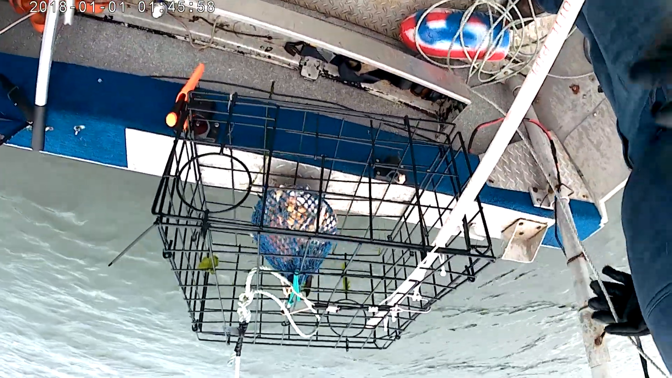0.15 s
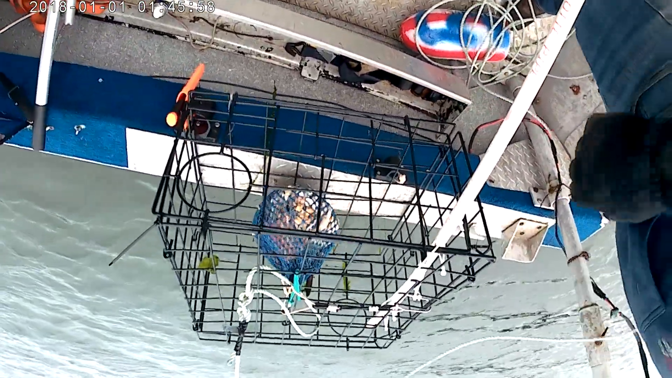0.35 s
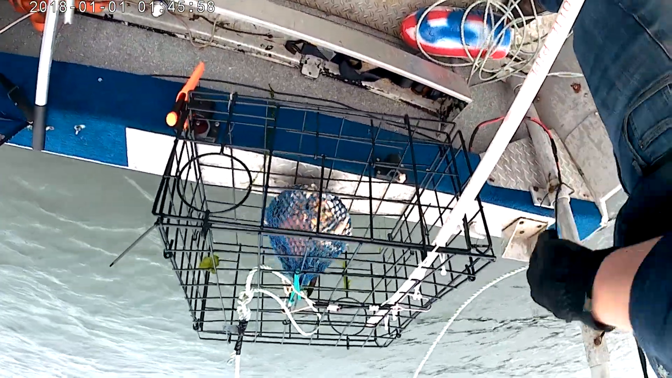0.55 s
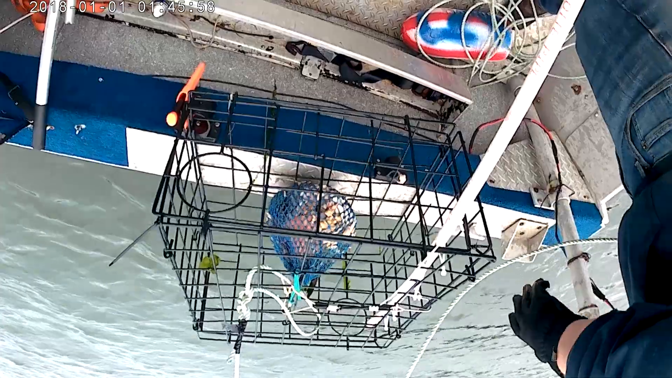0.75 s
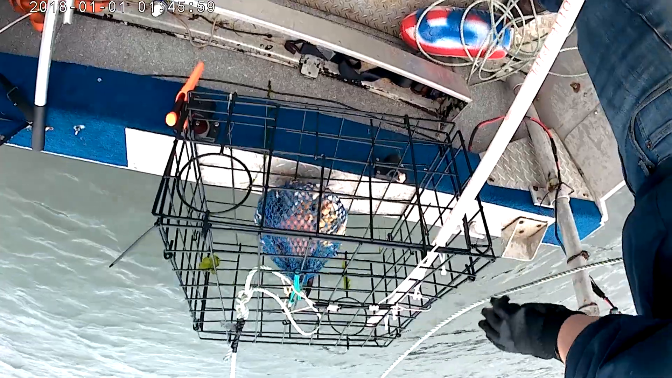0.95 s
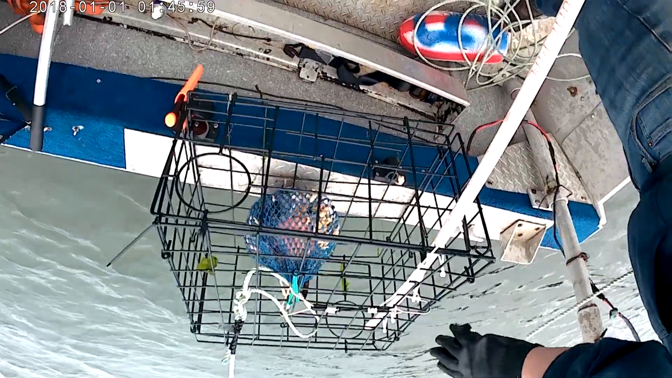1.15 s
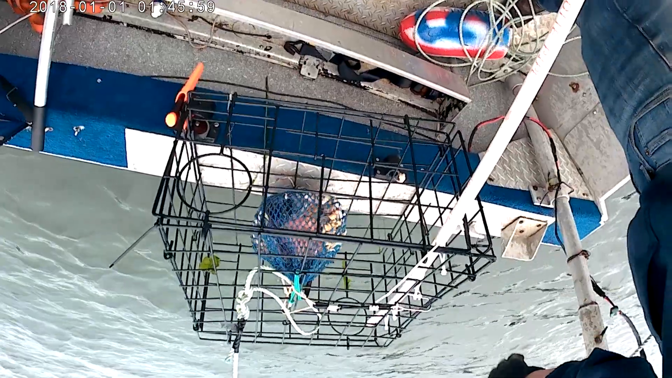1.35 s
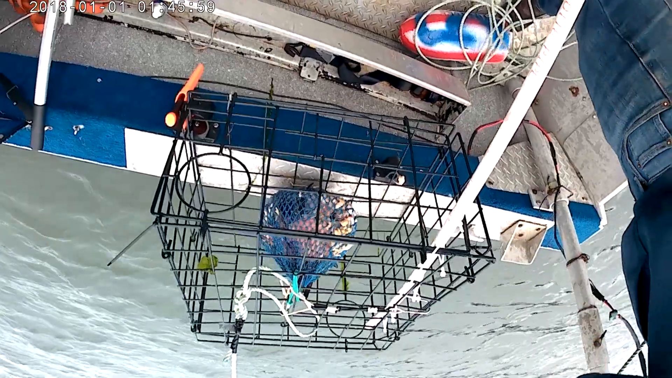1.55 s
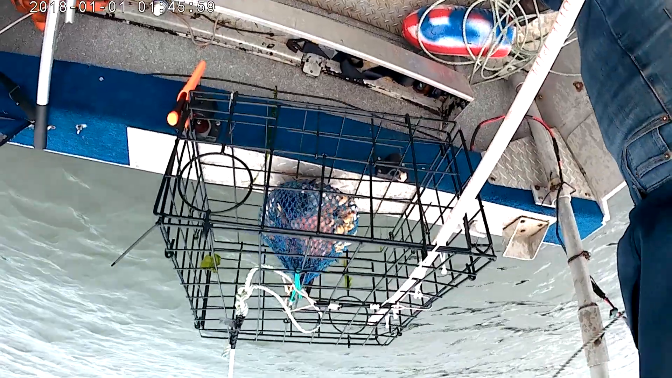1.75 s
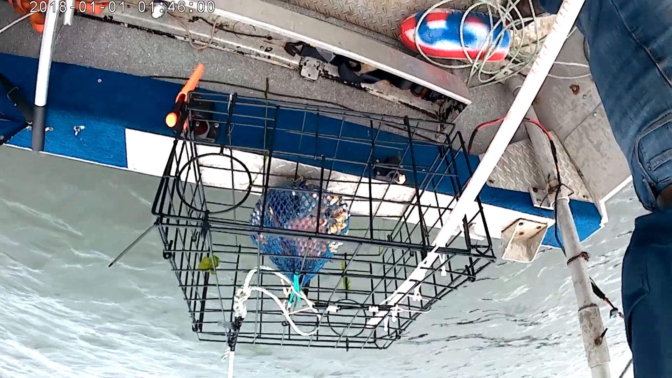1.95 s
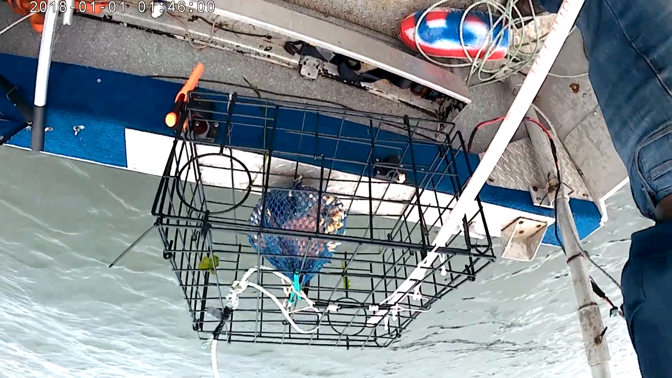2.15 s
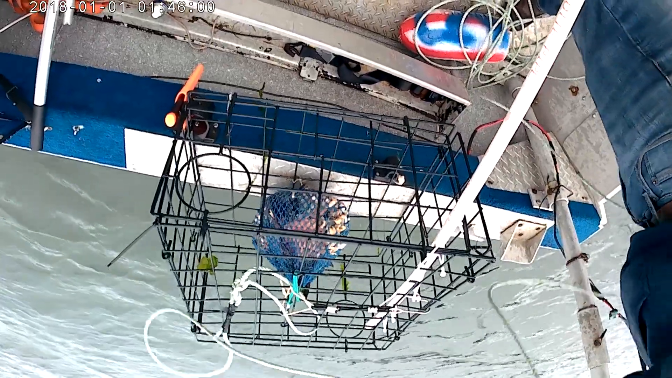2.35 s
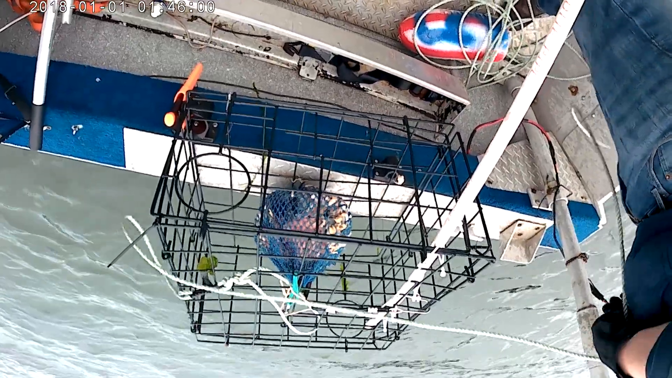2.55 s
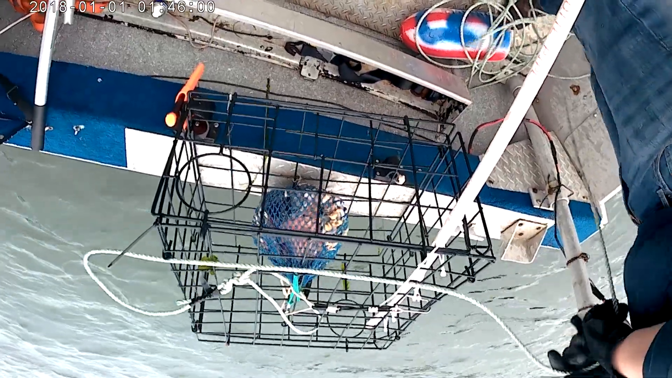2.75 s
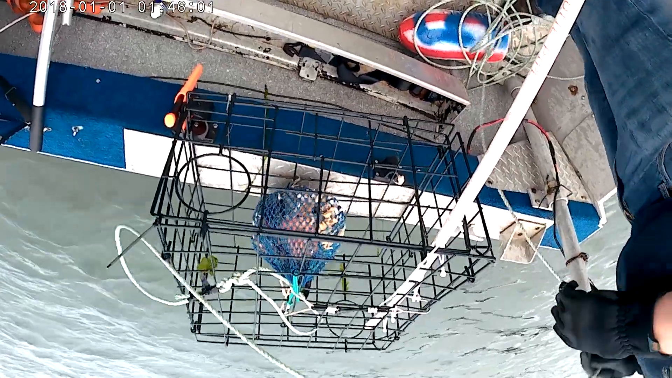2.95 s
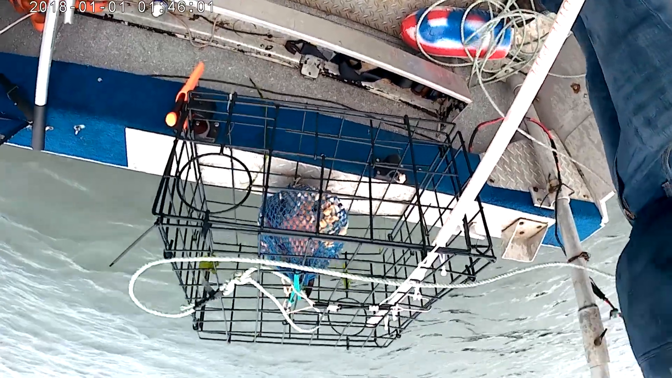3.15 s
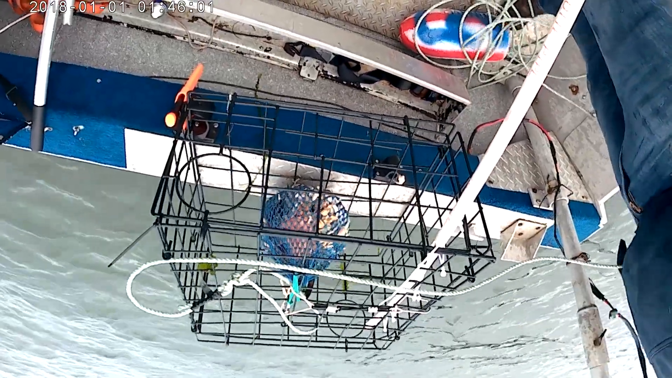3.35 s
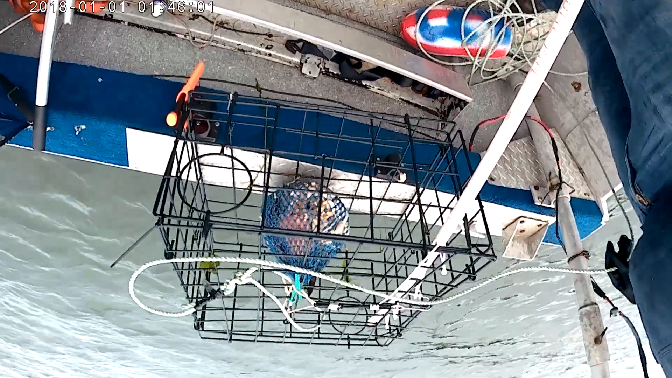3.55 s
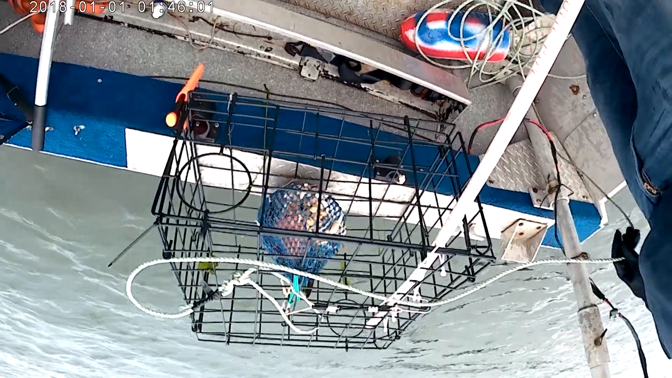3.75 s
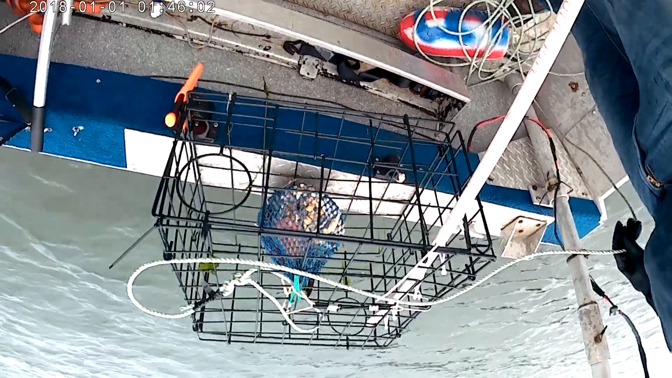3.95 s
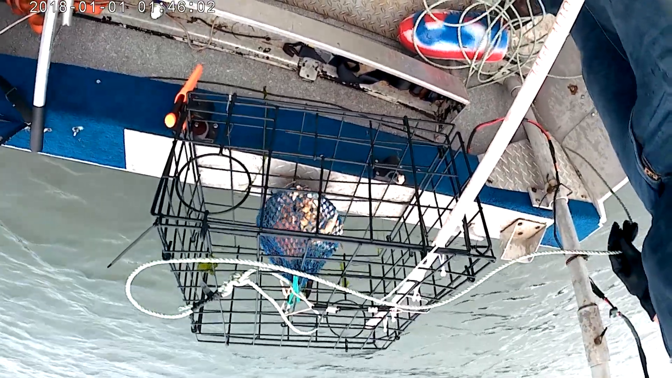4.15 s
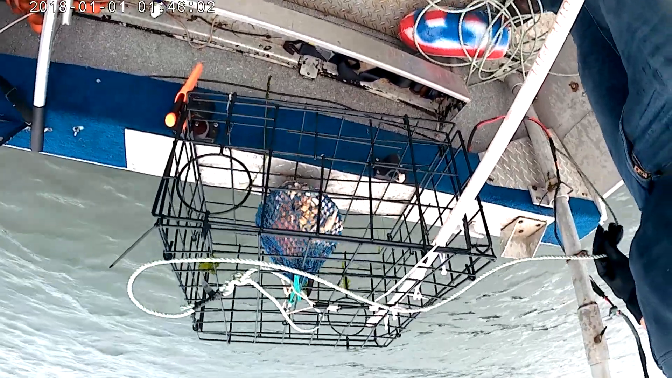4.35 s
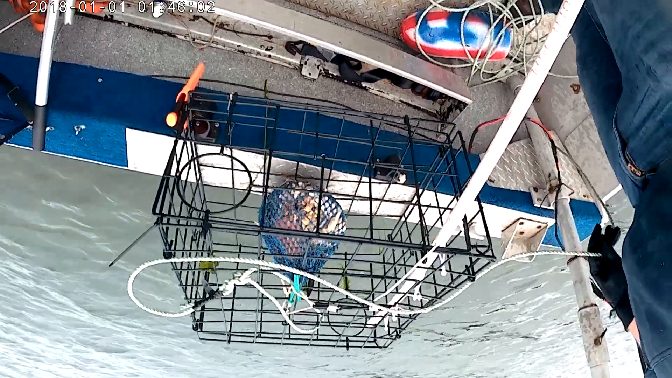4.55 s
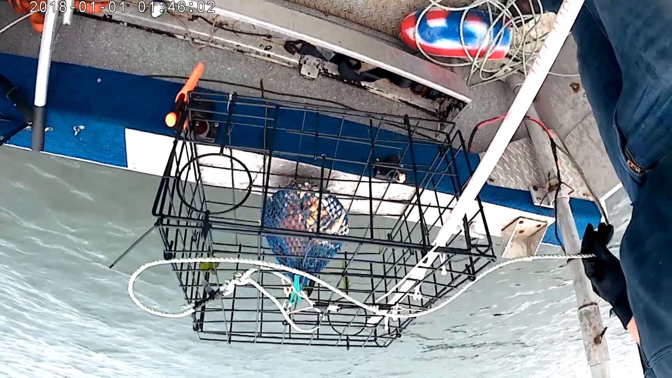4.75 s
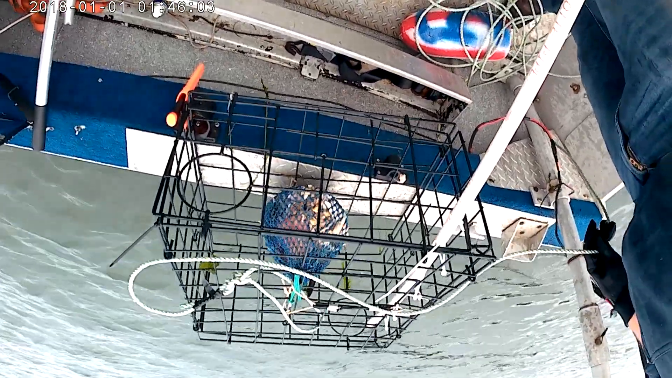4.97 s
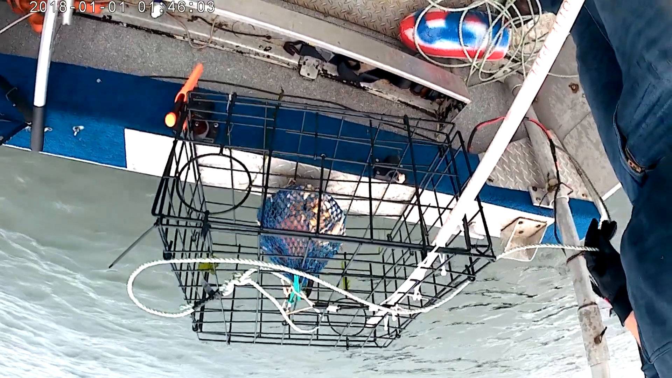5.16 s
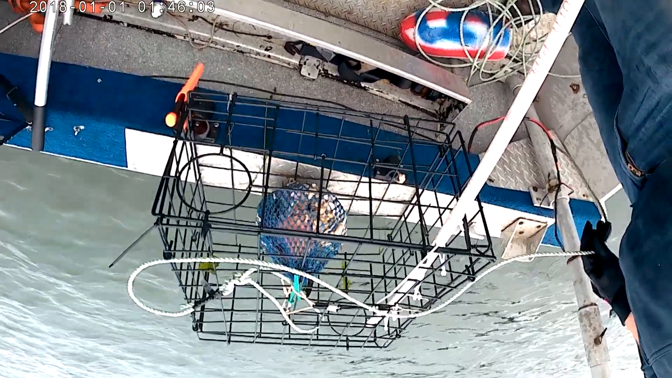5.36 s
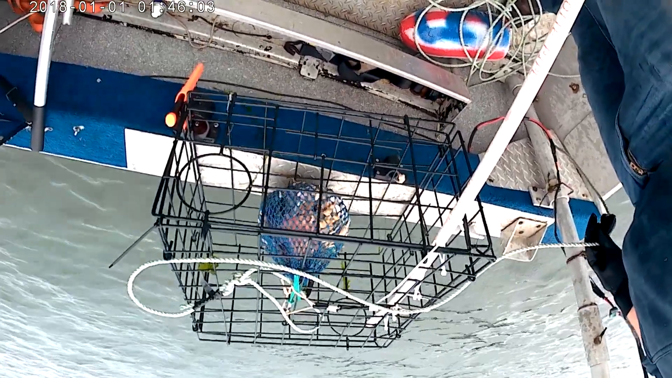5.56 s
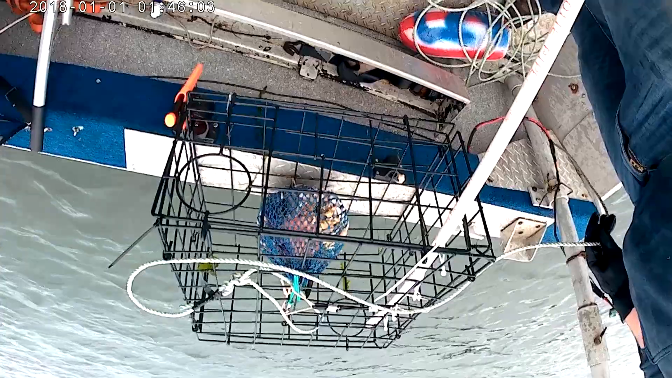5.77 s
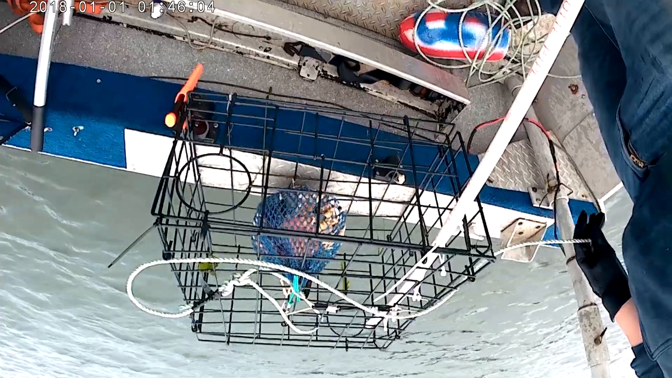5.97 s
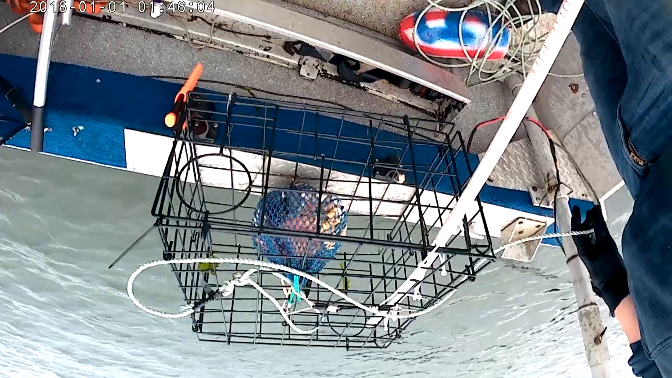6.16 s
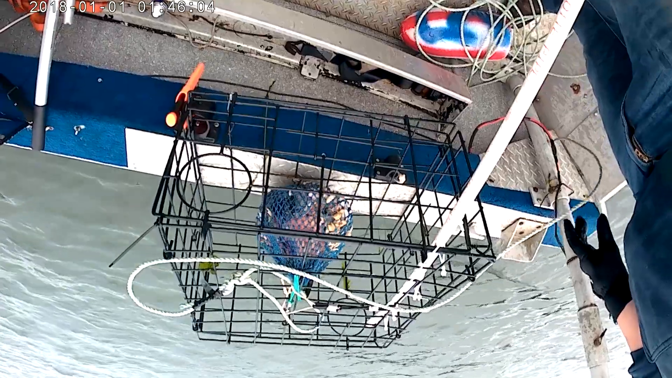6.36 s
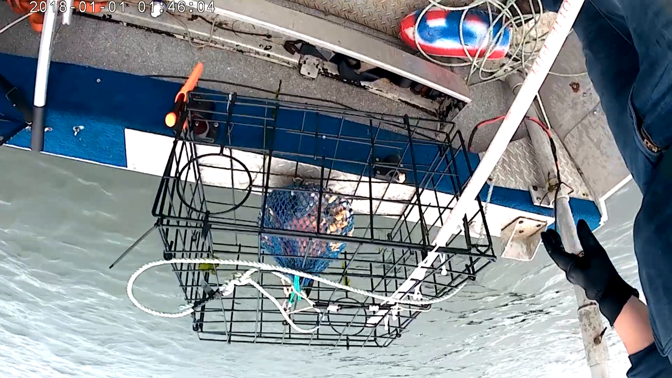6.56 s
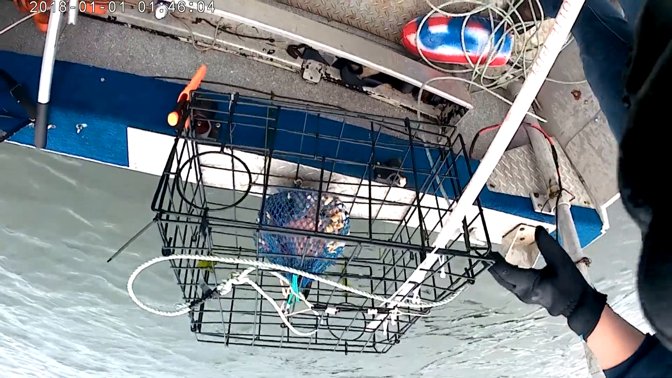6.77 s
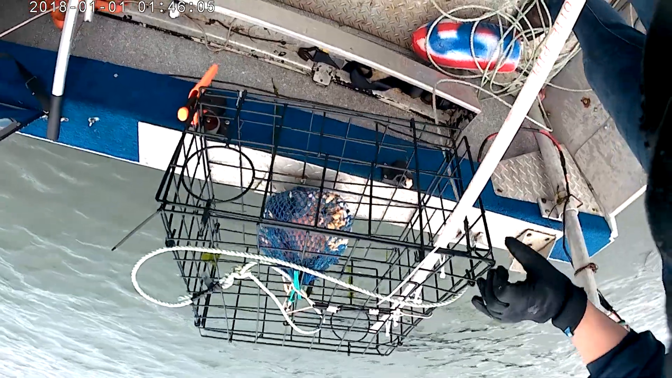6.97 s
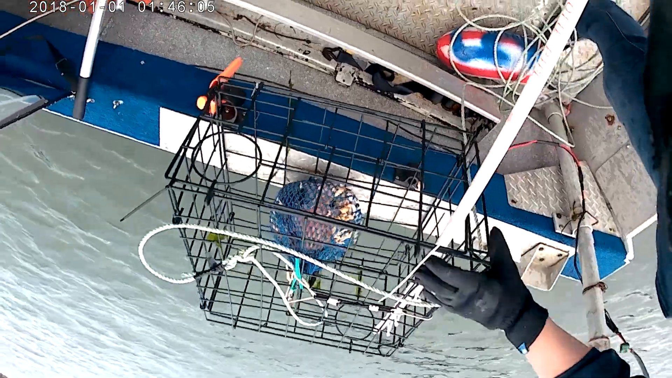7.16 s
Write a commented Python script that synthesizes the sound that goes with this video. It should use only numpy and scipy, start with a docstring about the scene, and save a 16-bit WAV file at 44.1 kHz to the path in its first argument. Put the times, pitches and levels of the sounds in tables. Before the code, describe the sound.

Heard dully from a sealed housing fixed to a boat, a low engine throb and boom run under steady light drips and soft hollow wavelets on the hull. A rope is thrown, clattering and scraping over wire and rail, whirring briefly before a hard, ringing bang. Dripping resumes; later the rope slides again and low wind puffs buffet the microphone.

```python
"""A boat idles with a wet wire crab trap beside it, heard dully through a sealed housing fixed to the boat.
Throb, boom and rumble run throughout; cloth brushes, drops ping and wavelets slap the hull.
A rope is thrown clear, clatters over wire and rail and whirrs; something knocks hard on the hull and rail.
Later the rope is drawn through again and wind buffets the housing.
Blows, water and rope excite decaying hull modes; drops and rail have modes of their own; wind is noise."""
import sys
import numpy as np
from scipy import signal
from scipy.fft import rfft, irfft
from scipy.io import wavfile
from scipy.ndimage import uniform_filter1d

SR = 44100
rng = np.random.default_rng(int(sys.argv[2]) if len(sys.argv) > 2 else 0)


def generate_wav(sig):
    """Save sig (samples, or channels by samples) to the path in sys.argv[1] as 16-bit PCM at SR."""
    pcm = np.round(np.clip(np.atleast_2d(sig).T, -1, 1) * 32767).astype(np.int16)
    wavfile.write(sys.argv[1], SR, pcm)


N = 317948
TIME = np.arange(N) / SR
RING_TIME = TIME[:SR]
HOUSING_HZ = 4200  # the sealed housing passes little above this

# Rope and trap striking the boat. Each row: time in seconds, level above the bass in dB, bass level in dB,
# length of the contact in seconds.
KNOCKS = [(1.486, -40, -46, 0.0025), (1.745, -39.5, -37, .0045), (1.884, -47, -52.5, 0.012),
          (2.078, -40.5, -45, 0.011), (2.126, -32, -33, 0.0059), (2.169, -29, -23.5, .0034),
          (2.184, -29, -40, 0.012), (2.199, -37, -30, 0.0048), (2.283, -31, -34.5, 0.0064),
          (2.332, -27.5, -23.5, 0.0051), (2.405, -32, -31.5, 0.0097), (2.428, -36, -38.5, 0.013),
          (2.480, -39, -34, 0.028), (2.699, -33, -34, 0.018), (2.8645, -18.5, -14, .0015),
          (2.894, -27, -38, .008), (3.024, -38.5, -47.5, 0.0029), (3.095, -42, -35, 0.0097),
          (3.253, -44, -43.5, 0.0063), (3.293, -42.5, -43.5, 0.026), (4.121, -47, -51, 0.0073),
          (4.579, -45.5, -44, 0.0071), (4.957, -42, -48, 0.0072), (6.108, -45.5, -49.5, 0.012),
          (6.218, -54, -40, 0.0042), (6.292, -51, -38.5, 0.032), (6.526, -53, -40.5, 0.01),
          (6.657, -45, -57, 0.017), (6.879, -42, -49.5, 0.0057), (7.098, -49, -69, .007)]


def from_db(db):
    """Amplitude gain of a level in dB."""
    return 10 ** (np.asarray(db) / 20)


def rms_one(x):
    """Scale to rms 1."""
    return x / np.sqrt(np.mean(x ** 2) + 1e-20)


def attack_rms(x):
    """Strength of a blow over its first 30 ms."""
    return np.std(x[:int(0.03 * SR)])


def evened(x, span_s=0.15):
    """Keep the grain of a sound but hold its slow level at rms 1."""
    power = np.abs(uniform_filter1d(x ** 2, int(span_s * SR)))
    return x / np.sqrt(power + 1e-12)


def in_time(rows):
    """The columns of a curve, sample by sample."""
    s, *columns = np.transpose(rows)
    return [np.interp(TIME, s, column) for column in columns]


def at_hz(rows, hz):
    """The columns of a spectrum at given frequencies, interpolated over log frequency."""
    row_hz, *columns = np.transpose(rows)
    return [np.interp(np.log(hz + 1e-9), np.log(row_hz), column) for column in columns]


def cut(x, hz, kind, order=2):
    """Butterworth filter."""
    return signal.sosfilt(signal.butter(order, hz, kind, fs=SR, output="sos"), x)


def noise(colour):
    """Steady noise of a given spectrum, empty up to 10 Hz; rms 1."""
    hz = np.arange(N // 2 + 1) * SR / N
    gain = from_db(at_hz(colour, hz)[0]) * (hz > 10)
    return rms_one(irfft(rfft(rng.standard_normal(N)) * gain, N))


def drift(rate_hz):
    """Slow random wander, falling off above a rate; rms 1."""
    hz = np.arange(N // 2 + 1) * SR / N
    return rms_one(irfft(rfft(rng.standard_normal(N)) / (1 + (hz / rate_hz) ** 4), N))


def wavering(hz, waver_hz, rate_hz):
    """A sine whose pitch wanders; rms 1."""
    cycles = np.cumsum(hz + waver_hz * drift(rate_hz)) / SR
    return np.sqrt(2) * np.sin(2 * np.pi * cycles)


def swell(s, db, rise_s, fall_s, hold_s=0):
    """Gain that rises to a level at time s, holds and dies away; rise and fall are 1/e times."""
    rise = np.minimum(TIME - s, 0) / rise_s
    fall = np.maximum(TIME - s - hold_s, 0) / fall_s
    return from_db(db) * np.exp(rise - fall)


def together(gains):
    """Unrelated sounds add in power."""
    return np.sqrt(sum(gain ** 2 for gain in gains))


def add(out, s, sound):
    """Mix a sound in at a time."""
    start = int(s * SR)
    out[start:start + len(sound)] += sound[:N - start]


def modes(table, scatter_db):
    """One second of decaying sines; each excitation shares its force out a little differently."""
    hz, level_db, t60_s = np.transpose(table)[:, :, None]
    strength = from_db(level_db + scatter_db * rng.standard_normal(hz.shape))
    sign = (-1) ** np.arange(len(hz))[:, None]
    decay = np.exp(-np.log(1000) * RING_TIME / t60_s)
    return np.sum(sign * strength * decay * np.sin(2 * np.pi * hz * RING_TIME), axis=0)


def wash():
    """Dense lesser hull modes as bands of noise, each with its own decay; rms 1."""
    # Each row: frequency in Hz, relative level in dB per Hz, t60 in seconds.
    wash_modes = [(60, -27.5, .3), (110, -6.5, .35), (167, -3.5, 0.42), (200, 7, 0.45), (317, 11, 0.34),
                  (528, -10, 0.64), (640, -8.5, 0.38), (875, 0, 0.19), (1090, -16, 0.29), (1408, 2.5, 0.39),
                  (1556, -11, 0.24), (1910, -21, 0.22), (2520, -22.5, 0.021), (3720, -50.5, 0.077)]
    edges_hz = np.geomspace(60, 4800, 26)
    white, out = rng.standard_normal((2, SR)), 0
    for k, band_hz in enumerate(zip(edges_hz, edges_hz[1:])):
        level_db, t60_s = at_hz(wash_modes, np.sqrt(band_hz[0] * band_hz[1]))
        decay = np.exp(-np.log(1000) * RING_TIME / t60_s)
        out = out + from_db(level_db) * cut(white[k % 2], band_hz, "band") * decay
    return rms_one(out)


def hull(wash_db=-3.0, crack_db=-4.5, crack_s=0.015):
    """The boat's answer to one click: a brief crack, then the modes and their wash; rms 1."""
    # What the hull rings with. Each row: frequency in Hz, relative level in dB, t60 in seconds.
    hull_modes = [(102.1, -2.5, 0.61), (120.9, 1, 0.38), (207.4, -3.5, 0.76), (230, 1.5, 0.23),
                  (270, 1.5, 0.097), (320, -3.5, 0.048), (327.7, -0.5, 0.45), (370, 1.5, 0.18),
                  (512.5, -14.5, 0.36), (611.2, -2.5, 0.19), (646, -4, 0.22), (698, -7.5, 0.42),
                  (833, -8.5, 0.19), (856, -5, 0.16), (1035.4, -5.5, 0.21), (1072, -17.5, 0.2),
                  (1112, -21.5, 0.37), (1361, -1.5, 0.17), (1430, 2.5, 0.075), (1542, -8, 0.2),
                  (1626, -7, 0.2), (1600, -17.5, 0.051), (1800, -18.5, 0.043), (2050, -10, .06),
                  (2039, -18.5, 0.15), (2350, -24.5, 0.19), (2710, -25.5, 0.17), (3000, -32, 0.23)]
    crack = rms_one(wash() * np.exp(-RING_TIME / crack_s))
    ring = rms_one(modes(hull_modes, scatter_db=0.5))
    return rms_one(ring + from_db(wash_db) * wash() + from_db(crack_db) * crack)


def lapping(rise_s=0.083, calm_db=-57, calm_swing_db=1.5):
    """How hard water splashes on the hull and how hard it pushes: a calm level and single wavelets."""
    # Each row: peak time in seconds, splash level in dB, hollow push level in dB, 1/e fall in seconds.
    laps = [(.33, -49, -56, 0.085), (.65, -47.5, -45.5, 0.43), (1.82, -46, -42, .14),
            (3.72, -52, -57, 0.13), (4.6, -49.5, -48.5, 0.22), (5.03, -48, -47, 0.043),
            (5.22, -45, -46, 0.031)]
    calm = from_db(calm_db + calm_swing_db * drift(3.3))
    splash = [swell(s, db, rise_s, fall_s) for s, db, _, fall_s in laps]
    push = [swell(s, db, rise_s, fall_s) for s, _, db, fall_s in laps]
    return together([calm] + splash), together([calm] + push)


def rubbing(work, catches_per_s=1000, spread_db=4.0, low_hz=260, soft_hz=1150):
    """Rope strands catch and water laps: a dense run of tiny, soft, uneven taps on the hull."""
    taps = (rng.random(N) < catches_per_s / SR) * rng.choice([-1, 1], N)
    taps = taps * from_db(spread_db * np.minimum(rng.exponential(1, N), 4))
    sound = cut(signal.fftconvolve(taps, hull(wash_db=0.0))[:N], low_hz, "high")
    return work * evened(cut(sound, soft_hz, "low"))


def slaps(push, hollow_db=-2.5, low_hz=95, high_hz=225):
    """Wavelets under the side make the hull's low modes sound hollow."""
    shaken = signal.fftconvolve(rng.standard_normal(N), hull())[:N]
    return from_db(hollow_db) * push * evened(cut(shaken, (low_hz, high_hz), "band"))


def booming(water, rope):
    """Level of the hull's lowest flex: it follows water and rope a little late, and swells after each blow."""
    water_boom_db, rope_boom_db = -35, -41.5  # before the boom gain, at a work level of work_db
    work_db, follow_exponent, lag_s = -44, 1.29, 0.055
    kick_db, rise_s, decay_s = -8, 0.022, 0.09  # kick is relative to the blow's bass
    gains = []
    for work, db in ((water, water_boom_db), (rope, rope_boom_db)):
        late = np.interp(TIME - lag_s, TIME, work)
        gains.append(from_db(db) * (late / from_db(work_db)) ** follow_exponent)
    for s, _, bass_db, _ in KNOCKS:
        gains.append(swell(s + rise_s, bass_db + kick_db, rise_s, decay_s))
    return together(gains)


def idling(flex, boom_db=-1.0, drone_db=-12.5, drone_hz=122, pulsing=0.14):
    """The engine's throb and a deck drone swell together; a boom, a pulsing rumble and a thin whine join."""
    # Each row: frequency in Hz, relative level in dB per Hz.
    rumble_colour = [(20, 4), (55, 0.5), (78, -14), (124, 0), (160, -19.5), (215, 2), (265, -19),
                     (330, -15.5), (520, -20), (900, -23), (1400, -27), (1800, -33), (3100, -33),
                     (4200, -47)]
    # Faint steady whine. Each row: frequency in Hz, level in dB.
    whine_tones = [(2340, -81), (3060, -92.5), (3121, -81)]
    rumble_db, engine_hz, boom_hz = -49, 21.43, 49.8
    throb_db, throb_swing_db, swells_per_s = -40, 3, 2.8
    shake = from_db(throb_db + throb_swing_db * drift(swells_per_s))
    beat = wavering(engine_hz, waver_hz=0.44, rate_hz=1.5)
    drone = cut(rng.standard_normal(N), (drone_hz * 0.87, drone_hz * 1.101), "band")
    drone = from_db(drone_db) * rms_one(drone)
    boom_tone = wavering(boom_hz, waver_hz=6.09, rate_hz=12) * (1 + 0.42 * drift(43))
    boom = from_db(boom_db) * flex * boom_tone
    rumble = from_db(rumble_db) * noise(rumble_colour) * (1 + pulsing * beat)
    whine = sum(from_db(db) * wavering(hz, waver_hz=4.7, rate_hz=25) for hz, db in whine_tones)
    return shake * (beat + drone) + boom + rumble + whine


def rustle(grain_db=4.5):
    """Sleeve and glove brush past: cloth slips in small uneven jerks."""
    # Each row: peak time in seconds, level in dB, 1/e swell and fade in seconds.
    brushes = [(.01, -61.5, .06), (.48, -60, .035), (6.5, -55.5, 0.026), (6.75, -62, 0.19),
               (7.0, -63.5, 0.13)]
    # Each row: frequency in Hz, relative level in dB per Hz.
    cloth_colour = [(300, -24), (1200, -1), (2000, 0.5), (2600, -7), (3200, -11), (4200, -24)]
    level = together(swell(s, db, width_s, width_s) for s, db, width_s in brushes)
    return level * rms_one(noise(cloth_colour) * from_db(grain_db * drift(120)))


def dribble(count=80, gap_s=0.17, gap_spread=0.32, level_db=-48.5, spread_db=1):
    """Light drops at uneven gaps: rows of time in seconds and level in dB."""
    gap, size = rng.standard_normal((count, 2)).T
    times = np.cumsum(gap_s * np.exp(gap_spread * gap)) - gap_s / 2
    return [(s, level_db + spread_db * z) for s, z in zip(times, size) if 0 < s < TIME[-1]]


def drips(level_db=-7.0, splash_db=-5.0, echo_s=0.011, echo=0.38, tick=0.05, tick_s=0.005):
    """A drop ticks and pings, comes back once across the boat, and its splash stirs the hull faintly."""
    # Heavier drops. Each row: time in seconds, level in dB before level_db.
    heavy_drops = [(0.0333, -45.5), (0.118, -47), (0.3795, -47), (0.5643, -47), (0.6005, -43),
                   (0.7597, -38), (0.8939, -37), (0.974, -40.5), (1.075, -40), (1.2047, -39.5),
                   (1.5499, -43.5), (3.4927, -47), (3.565, -46.5), (3.681, -41), (3.755, -41),
                   (3.8122, -46.5), (3.8477, -45), (3.9004, -40.5), (4.0434, -45), (4.3067, -40.5),
                   (4.4687, -44), (4.5564, -42.5), (4.6617, -41.5), (4.7644, -42.5), (4.8532, -43.5),
                   (5.16, -44.5), (5.2024, -39.5), (5.3386, -43.5), (5.5869, -41.5), (5.8143, -37.5),
                   (5.9334, -40), (6.014, -46.5), (6.221, -38.5), (6.422, -38.5), (6.7201, -38.5),
                   (6.9447, -39), (7.1454, -45), (7.1878, -42.5)]
    # What a drop sets ringing. Each row: frequency in Hz, relative level in dB, t60 in seconds.
    ping_modes = [(618, -6.5, 0.091), (745, -18.5, 0.24), (875, -9.5, 0.41), (1029.3, 3, 0.2),
                  (1120, -20.5, 0.084), (1322, 0, 0.17), (1380, -5, 0.16), (1460, -4.5, 0.1),
                  (1568, 1, 0.046), (1603, -7, 0.11), (2840, -13.5, 0.049), (2960, -20.5, 0.045)]
    out = np.zeros(N)
    splashes = [rms_one(cut(wash(), (500, 1700), "band")) for _ in range(5)]
    for k, (s, drop_db) in enumerate(heavy_drops + dribble()):
        splash = splashes[k % len(splashes)]
        ping = rms_one(modes(ping_modes, scatter_db=3.0))
        delay_s = echo_s * rng.uniform(0.9, 1.2)
        ping = ping + echo * np.interp(RING_TIME - delay_s, RING_TIME, ping, left=0)
        click = tick * rms_one(splash * np.exp(-RING_TIME / tick_s))
        drop = rms_one(ping) + from_db(splash_db) * splash + click
        add(out, s, from_db(drop_db + level_db) * drop / attack_rms(drop))
    return out


def hardness_hz(db, contact_s):
    """Upper edge of a blow's spectrum: higher the shorter and the stronger the blow."""
    middling_hz, middling_s, middling_db = 2000, 0.0045, -38.5
    softening, db_per_octave = 0.3, 27.5  # octaves lost per doubling of contact; dB gaining one octave
    return middling_hz * (middling_s / contact_s) ** softening * 2 ** ((db - middling_db) / db_per_octave)


def knocks(bass_hz=480, rattle=0.2, touches_per_s=2000, clean_hit_s=0.015):
    """Each blow is a first touch and a short rattle of wire and rope, rung through the hull."""
    out, spots = np.zeros(N), [hull() for _ in range(6)]
    for k, (s, upper_db, bass_db, contact_s) in enumerate(KNOCKS):
        touches = rng.standard_normal(SR) * (rng.random(SR) < touches_per_s / SR)
        force = rattle * touches * np.exp(-(RING_TIME / contact_s) ** 2)
        force[0] = np.exp(-contact_s / clean_hit_s)  # a long, glancing contact has a weaker first touch
        blow = signal.fftconvolve(force, spots[k % len(spots)])[:SR]
        blow = cut(blow, min(hardness_hz(upper_db, contact_s), HOUSING_HZ), "low")
        for kind, db in (("high", upper_db), ("low", bass_db)):
            part = cut(blow, bass_hz, kind, order=3)
            add(out, s, from_db(db) * part / attack_rms(part))
    return out


def sliding():
    """How hard the rope works on the rail: thrown clear, later drawn through again."""
    # Each row: time in seconds, level in dB.
    throw = [(1.98, -54.5), (2.1, -41), (2.2, -27), (2.35, -39), (2.61, -40), (2.72, -39.5), (3.0, -40.5),
             (3.32, -44), (3.44, -59.5)]
    # Each row: time in seconds, level in dB.
    haul = [(6.05, -58), (6.14, -48.5), (6.24, -42.5), (6.34, -36), (6.54, -45), (6.66, -50.5)]
    work = 0
    for move in (throw, haul):
        moving = (TIME > move[0][0]) & (TIME < move[-1][0])
        work = work + from_db(in_time(move)[0]) * moving
    return work


def whirr(rough=0.26, flutter_hz=9.0):
    """The flying rope sings two rough, fluttering notes."""
    # Each row: time in seconds, pitch in Hz, level in dB.
    upper_note = [(2.66, 905, -46.5), (2.70, 872, -39.5), (2.74, 875, -39.5), (2.79, 874, -50),
                  (2.85, 893, -38), (2.88, 860, -79.5)]
    # Each row: time in seconds, pitch in Hz, level in dB.
    lower_note = [(2.70, 625, -70), (2.76, 601, -39.5), (2.81, 597, -41.5), (2.85, 568, -56.5),
                  (2.88, 604, -46.5)]
    out = 0
    for note in (upper_note, lower_note):
        hz, db = in_time(note)
        sounding = (TIME > note[0][0]) & (TIME < note[-1][0])
        level = sounding * from_db(db) * (1 + rough * drift(60))
        out = out + level * wavering(hz, waver_hz=flutter_hz, rate_hz=23.0)
    return out


def bang(bang_s=2.864, gain_db=-14, contact_s=0.0018):
    """The hardest blow also lands on the rail that carries the housing: it clangs briefly and hums on."""
    # Each row: frequency in Hz, level in dB before gain_db, t60 in seconds.
    rail_modes = [(205.5, -3.5, 0.48), (234.2, 5.5, 0.158), (309, 10, 0.043), (334.6, -10.5, 0.88),
                  (623.6, 0, 0.14), (827, -7, 0.13), (1435, 7, 0.071), (1631, 8, 0.032), (1840, -9, 0.047),
                  (2477, -18, 0.09)]
    out = np.zeros(N)
    onset = 1 - np.exp(-RING_TIME / contact_s)
    add(out, bang_s, from_db(gain_db) * modes(rail_modes, scatter_db=0.0) * onset)
    return out


def gust(rise_s=0.0098, fall_s=0.03):
    """Puffs of wind on the housing: lumpy low noise."""
    # Each row: time of full level in seconds, length held in seconds, level in dB.
    puffs = [(6.447, .11, -30), (6.686, 0.091, -33), (6.874, 0.15, -31), (7.106, .06, -35)]
    # Each row: frequency in Hz, relative level in dB per Hz.
    wind_colour = [(12, 9), (25, 5.5), (50, 4), (72, -11.5), (110, -5), (160, -24.5), (320, -20.5),
                   (700, -64)]
    level = together(swell(s, db, rise_s, fall_s, length_s) for s, length_s, db in puffs)
    return level * noise(wind_colour)


def scene(jerk_db=1.0, jerks_per_s=18):
    """Sum all sources on one channel; the rope slides in small jerks."""
    splash, push = lapping()
    rope = sliding()
    work = together([splash, rope * from_db(jerk_db * drift(jerks_per_s))])
    boat = rubbing(work) + slaps(push) + idling(booming(push, rope))
    handling = rustle() + knocks() + whirr() + bang()
    return (boat + handling + drips() + gust())[None]


def record(dry, clip_level=0.7, cutoff_hz=16000):
    """The housing shuts out the treble; overload clips the peaks before a last low-pass."""
    muffled = cut(dry, HOUSING_HZ, "low", order=12)
    return cut(np.clip(muffled, -clip_level, clip_level), cutoff_hz, "low", order=12)


dry = scene()
out = record(dry)
generate_wav(out)
```